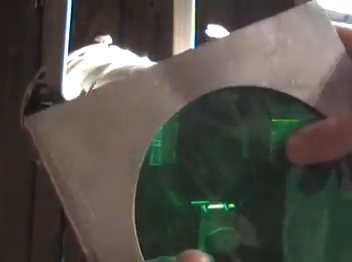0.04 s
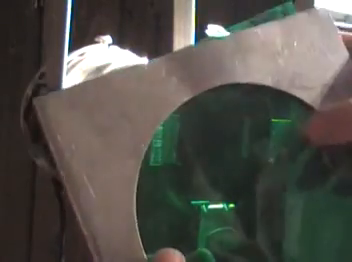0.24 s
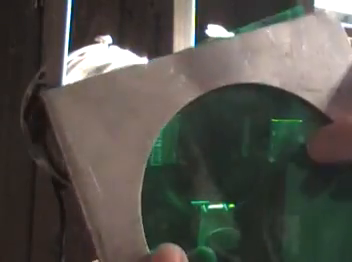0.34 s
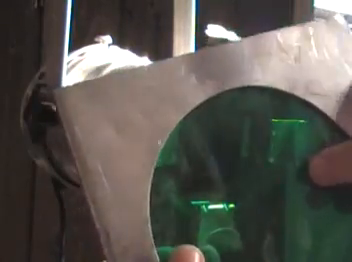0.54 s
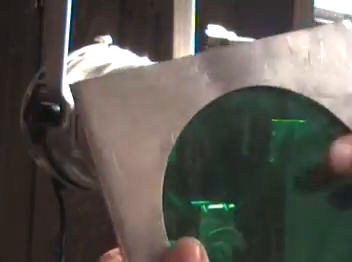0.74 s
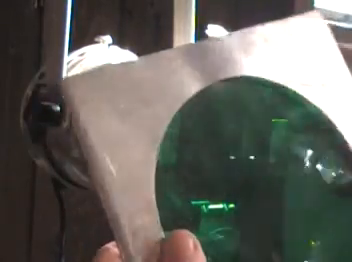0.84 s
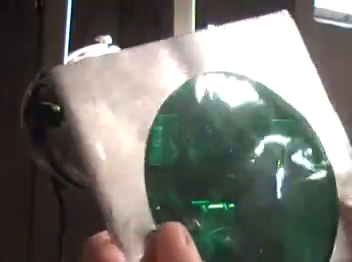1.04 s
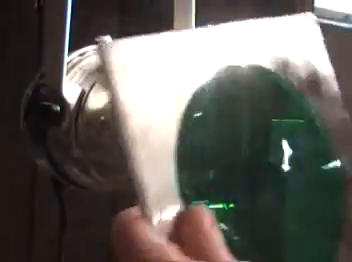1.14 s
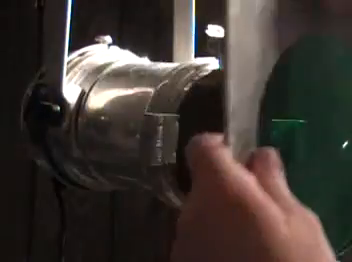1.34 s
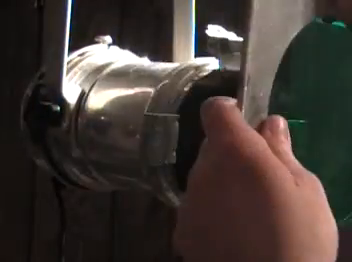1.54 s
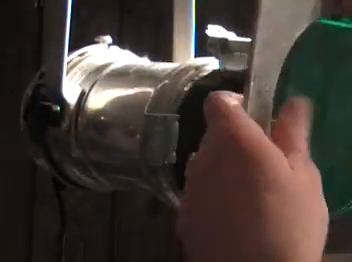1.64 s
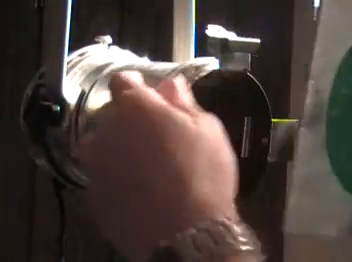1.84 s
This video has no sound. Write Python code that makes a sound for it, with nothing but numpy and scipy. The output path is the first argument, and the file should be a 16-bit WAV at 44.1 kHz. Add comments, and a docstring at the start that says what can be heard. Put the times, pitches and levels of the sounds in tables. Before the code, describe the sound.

A thin plastic sheet slides into a metal frame, close by, with a soft hiss and irregular papery pops for the first 0.8 seconds. It snaps home sharply around 0.8 to 0.9 seconds. After a short lull with tiny faint squeaks, fingers rub the frame and it clicks lightly from about 1.4 to 1.6 seconds, with one sharper click. A faint room rumble and electrical hum lie underneath.

```python
"""In a quiet room, close by, a thin plastic gel sheet is pushed into a sheet-metal frame.
The sheet hisses as it slides, in thousands of tiny slips. It buckles in short papery pops and snaps
home; each pop is a sharp crack and a flutter of waves bending the sheet. Sharp snaps, clicks, rubs and
faint squeaks follow as the frame is handled. Under it all lie a low room rumble and a mains hum."""
import sys
import numpy as np
from scipy import signal
from scipy.fft import rfft, irfft, next_fast_len
from scipy.io import wavfile
from scipy.ndimage import uniform_filter1d

SR = 44100
rng = np.random.default_rng(int(sys.argv[2]) if len(sys.argv) > 2 else 0)


def wav_out(sig):
    """Save sig, one row per channel (or a flat mono array), as 16-bit PCM at SR to the path in sys.argv[1]."""
    wavfile.write(sys.argv[1], SR, np.round(np.clip(np.atleast_2d(sig).T, -1, 1) * 32767).astype(np.int16))


N = 83790
TIME = np.arange(N) / SR
SNAP_TIME = TIME[:SR // 6]


def from_db(db):
    """Turn decibels into a number to multiply by."""
    return 10 ** (np.asarray(db) / 20)


def unit(x):
    """Scale a sound so that its energy is 1."""
    return x / np.sqrt(np.sum(x ** 2) + 1e-20)


def stereo(mid, side, pan_db=0):
    """Make left and right from what they share (mid) and how they differ (side)."""
    return np.array([(mid + side) * from_db(pan_db), (mid - side) * from_db(-pan_db)])


def tinted(x, colour, bass_db=0, treble_db=0, keep_power=True, bass_hz=630, treble_hz=3560):
    """Make each pitch louder or softer along a colour curve, with bass and treble controls."""
    size = next_fast_len(len(x) + 2048)
    hz = np.maximum(np.arange(size // 2 + 1) * SR / size, 1)
    colour_hz, colour_db = np.transpose(colour)
    bass = bass_db / (1 + (hz / bass_hz) ** 4)
    treble = treble_db / (1 + (treble_hz / hz) ** 4)
    gain = from_db(np.interp(np.log(hz), np.log(colour_hz), colour_db) + bass + treble)
    if keep_power:
        gain = gain / np.sqrt(np.mean(gain ** 2))
    # Fold the filter so that it rings only after a sound, never before it.
    cepstrum = irfft(np.log(gain), size)
    cepstrum[1:size // 2] *= 2
    cepstrum[size // 2 + 1:] = 0
    return irfft(rfft(x, size) * np.exp(rfft(cepstrum)), size)[:len(x)]


# The colour of the room's rumble. Each row: pitch in Hz, boost or cut in dB.
RUMBLE_COLOUR = [(25, -17), (60, -2.5), (125, 5.5), (200, -2.5), (700, -10.5), (1300, -20), (2500, -29),
                 (7600, -35.5), (11500, -43), (13500, -69)]
# How wide the rumble sounds. Each row: pitch in Hz, side compared with mid in dB.
RUMBLE_WIDTH = [(100, -3.5), (300, -2), (1300, 1)]
# The tones of the mains hum. Each row: pitch in Hz, level in dB.
HUM_TONES = [(119.7, -59.5), (241, -63.5)]


def background(rumble_db=-51):
    """The room rumbles and the mains hum; the faint hiss sounds wider than the lows."""
    mid, side = [from_db(rumble_db) * tinted(x, RUMBLE_COLOUR) for x in rng.standard_normal((2, N))]
    hum = sum(from_db(db) * np.sqrt(2) * np.sin(2 * np.pi * (hz * TIME + rng.random()))
              for hz, db in HUM_TONES)
    return stereo(mid + hum, tinted(side, RUMBLE_WIDTH, keep_power=False))


# The colour of rubbing. Each row: pitch in Hz, boost or cut in dB.
RUB_COLOUR = [(50, -33), (170, -16), (350, -6.5), (900, 4.5), (1600, 1), (2600, 0), (4200, -3.5), (6000, 1),
              (7800, 3), (9500, -3.5), (12500, -17.5), (14000, -40)]


def friction(slips_per_s=3600, spread_db=3.5, hiss_gain=0.65):
    """Surfaces catch and let go in tiny slips, over a smooth hiss."""
    slips = (rng.random(N) < slips_per_s / SR) * rng.choice([-1, 1], N)
    strength = from_db(spread_db * np.minimum(rng.exponential(1, N), 5))
    hiss = hiss_gain * unit(rng.standard_normal(N))
    return np.sqrt(N) * unit(tinted(unit(slips * strength) + hiss, RUB_COLOUR))


# The sheet sliding in. Each row: time in seconds, level in dB.
SLIDE_LEVELS = [(0, -47), (.045, -50), (.07, -47), (.115, -52), (.15, -39.5), (.205, -44.5), (.245, -48.5),
                (.28, -61), (.305, -50.5), (.335, -45), (.36, -52.5), (.395, -43.5), (.425, -61),
                (.44, -55), (.46, -39), (.485, -48), (.525, -47), (.56, -57), (.59, -38.5), (.625, -55),
                (.66, -50.5), (.682, -42.5), (.712, -49.5), (.728, -43), (.762, -62), (.85, -53),
                (.89, -79), (.933, -59), (.97, -78)]
# Fingers shifting on the frame. Each row: time in seconds, level in dB.
FINGER_LEVELS = [(1.18, -75.5), (1.235, -60.5), (1.32, -71.5), (1.37, -72), (1.405, -58), (1.45, -54),
                 (1.47, -68), (1.495, -57.5), (1.535, -50), (1.61, -49), (1.65, -63), (1.70, -80)]
# How wide rubs and snaps sound. Each row: pitch in Hz, side compared with mid in dB.
CLOSE_WIDTH = [(150, 0.5), (500, -12.5), (1200, -30), (4000, -14.5), (6500, -17.5), (8500, -4.5),
               (12000, -10)]


def rubbing(flicker_db=2.28):
    """The sheet slides between the metal leaves; later the fingers shift their grip."""
    flicker = np.sqrt(N) * unit(uniform_filter1d(rng.standard_normal(N), size=260))
    level = sum(from_db(np.interp(TIME, *np.transpose(rows))) for rows in (SLIDE_LEVELS, FINGER_LEVELS))
    mid = friction()
    side = tinted(friction(), CLOSE_WIDTH, keep_power=False)
    return level * from_db(flicker_db * flicker) * stereo(mid, side, pan_db=-0.55)


def crack(lag_s):
    """High bending waves run faster, so a click becomes a falling chirp; 1 kHz takes lag_s to arrive."""
    size = len(SNAP_TIME)
    khz = np.arange(size // 2 + 1) * SR / size / 1000
    chirp = irfft(np.exp(-4j * np.pi * 1000 * lag_s * np.sqrt(khz)), size)
    return chirp * (np.arange(size) < size // 2)


def flutter(fade_s, split_hz=2210, lows_linger=1.7):
    """Bending waves cross a thin plate in a dense burst; the slow, low ones die last."""
    lowpass = signal.butter(2, split_hz, fs=SR, output="sos")
    highpass = signal.butter(2, split_hz, "high", fs=SR, output="sos")
    low_noise, high_noise = rng.choice([-1., 1.], (2, len(SNAP_TIME)))
    lows = signal.sosfilt(lowpass, low_noise * np.exp(-SNAP_TIME / (fade_s * lows_linger)))
    highs = signal.sosfilt(highpass, high_noise * np.exp(-SNAP_TIME / fade_s))
    return unit(lows + highs)


def ringing(hz, ring_s):
    """One struck tone, which fades by 60 dB in its ring time, ring_s."""
    return unit(np.sin(2 * np.pi * hz * SNAP_TIME) * from_db(-60 * SNAP_TIME / ring_s))


def snaps(rows, colour, tones, lag_s, spot_db=5, spot_octaves=0.4):
    """A spot gives way with a crack, a flutter and a faint ring, all favouring the spot's own pitch."""
    mid, side = np.zeros((2, N + SR))
    pitches = np.geomspace(50, 20000, 200)
    colour_hz, colour_db = np.transpose(colour)
    body_db = np.interp(np.log(pitches), np.log(colour_hz), colour_db)
    for start_s, db, bass_db, treble_db, crack_db, fade_s, spot_hz in rows:
        peak_db = spot_db * np.exp(-(np.log2(pitches / spot_hz) / spot_octaves) ** 2)
        spot_colour = np.column_stack([pitches, body_db + peak_db])
        burst = flutter(fade_s) + from_db(crack_db) * crack(lag_s)
        burst = tinted(burst, spot_colour, bass_db, treble_db)
        ring = sum(from_db(tone_db + rng.normal(0, 4.3)) * ringing(hz, ring_s)
                   for hz, tone_db, ring_s in tones)
        ring = tinted(ring, np.column_stack([pitches, peak_db]), bass_db, treble_db, keep_power=False)
        ring *= from_db(-max(treble_db, 0))  # a brighter snap does not ring louder
        side_burst = tinted(flutter(fade_s), spot_colour, bass_db, treble_db)
        start = int(start_s * SR)
        mid[start:start + len(burst)] += from_db(db) * (unit(burst) + ring)
        side[start:start + len(burst)] += from_db(db) * unit(side_burst)
    return stereo(mid[:N], tinted(side[:N], CLOSE_WIDTH, keep_power=False), pan_db=-0.3)


# The sheet's pops. Each row: start in seconds, level in dB, bass in dB, treble in dB,
# crack compared with flutter in dB, flutter fade time in seconds, pitch of the spot in Hz.
SHEET_POPS = [(.0197, -13, -7, 23, -19, 0.0014, 6700), (.0882, -9, -10.5, -2.5, -18, 0.006, 820),
              (.0985, -7, -0.5, -0.5, -4, 0.014, 1570), (.166, -13, 0, -21, -18, 0.0019, 1500),
              (.237, -16.5, -11, -3.5, -29, 0.0056, 1590), (.2968, -16.5, 10, 1.5, -2, 0.0041, 900),
              (.310, -10.5, -10, -7, 0, 0.0053, 2130), (.3232, -2.5, 3.5, -1.5, -15, .015, 1440),
              (.3995, -12, -1, 0, -23, 0.009, 890), (.4320, -18, 13.5, 4.5, -2, 0.0032, 880),
              (.486, -14.5, 8, -15, -10, 0.0096, 900), (.502, -14.5, 5.5, 1, -13, 0.0044, 6250),
              (.517, -11, 4, -13, -19, 0.012, 1510), (.530, -14, 14, -26, -18, 0.0039, 845),
              (.543, -14.5, 7, -28, -20, 0.0078, 1400), (.5775, -7.5, 1.5, -18, -16, 0.016, 342),
              (.588, -14.5, -1, -2, 9, 0.0046, 1580), (.680, -12, 5, -1, -10, 0.013, 734),
              (.727, -19, 15, 15, -5, .004, 8000), (.7752, -1.3, 1, 3, -2.5, 0.0063, 670)]
# The colour of the plastic. Each row: pitch in Hz, boost or cut in dB.
SHEET_COLOUR = [(50, -67), (120, -20), (220, -5.5), (340, 0), (600, -0.5), (850, 2), (1600, -0.5),
                (2400, -3), (4000, -4.5), (7500, -6.5), (10000, -19), (13000, -40), (15000, -60)]
# The sheet's own tones. Each row: pitch in Hz, typical level within a pop in dB, ring time in seconds.
SHEET_TONES = [(343.7, -17.5, 0.15), (856, -15, 0.033), (1130, -25, 0.18), (1545, -26, 0.15)]


def sheet_pops():
    """The pushed plastic buckles again and again, then snaps home."""
    return snaps(SHEET_POPS, SHEET_COLOUR, SHEET_TONES, lag_s=0.000779)


# Knocks and pings. Each row: start in seconds, pitch in Hz, level in dB, ring time in seconds.
PATCH_KNOCKS = [(.0882, 844, -9, 0.049), (.3995, 12400, -24, 0.0032), (.9066, 3900, -11, 0.01),
                (1.563, 1110, -16.5, 0.03), (1.633, 840, -11.5, 0.042)]


def knocks():
    """Some contacts make one patch of sheet or frame ring, as a hollow knock or a bright ping."""
    mid = np.zeros(N + SR)
    for start_s, hz, db, ring_s in PATCH_KNOCKS:
        start = int(start_s * SR)
        mid[start:start + len(SNAP_TIME)] += from_db(db) * ringing(hz, ring_s)
    return stereo(mid[:N], 0, pan_db=-0.3)


# Sharp snaps and clicks. Each row: start in seconds, level in dB, bass in dB, treble in dB,
# crack compared with flutter in dB, flutter fade time in seconds, pitch of the spot in Hz.
SHARP_CLICKS = [(.8207, 6, -5.5, 2, 1, 0.0037, 2100), (.9066, -2, 9, 11.5, -3, 0.0044, 7800),
                (1.378, -28.5, 5, 10, -9, 0.0091, 2700), (1.399, -23, 1, 6.5, 1, 0.0052, 2700),
                (1.429, -20.5, 8.5, -6, -1, 0.019, 1290), (1.5135, -15, 3, 5.5, -4, 0.0023, 1700),
                (1.563, -7, -2, -12, -11, 0.013, 2000), (1.5755, 1.5, 0.5, 3, -39, 0.0064, 4360),
                (1.619, -16.5, 19, -8, -6, 0.0076, 1860), (1.633, -7.5, -4, 0, -2, 0.0086, 1140),
                (1.8365, -36, -1, 8, 7, 0.0026, 6400)]
# Their colour. Each row: pitch in Hz, boost or cut in dB.
CLICK_COLOUR = [(100, -39), (300, -3), (650, -5), (1050, 3), (1500, -1.5), (2200, 0), (3300, -3),
                (4050, -5), (5200, -5.5), (6500, 0), (8200, -7), (10000, -14), (13500, -35)]
# Their ringing tones. Each row: pitch in Hz, typical level within a click in dB, ring time in seconds.
CLICK_TONES = [(1009, -18, 0.098), (1110, -23.5, 0.088), (1525, -17, 0.052), (1950, -31, 0.034),
               (2663, -14, 0.085), (4100, -20, 0.054), (6410, -23, 0.038)]


def sharp_clicks():
    """Sharp snaps and clicks that ring briefly."""
    return snaps(SHARP_CLICKS, CLICK_COLOUR, CLICK_TONES, lag_s=0.00008)


# Faint squeaks. Each row: loudest moment in seconds, pitch in Hz, level in dB.
FAINT_SQUEAKS = [(1.021, 1924, -58.5), (1.322, 1894, -58), (1.784, 2910, -61.5)]


def squeaks(swell_s=0.0052):
    """As the frame is handled, tiny tones swell and fade in a few hundredths of a second."""
    return sum(from_db(db) * np.sin(2 * np.pi * hz * TIME) * np.exp(-((TIME - peak_s) / swell_s) ** 2)
               for peak_s, hz, db in FAINT_SQUEAKS)


def room_echo(sound, ring_s=0.18, delay_s=0.0066, dull_hz=4600, level_db=-13.5, side_db=-11):
    """Sound bounces around the room and leaves a short, dull tail."""
    t = TIME[:SR // 2]
    tails = rng.standard_normal((2, len(t))) * from_db(-60 * t / ring_s) * (t > delay_s)
    lowpass = signal.butter(1, dull_hz, fs=SR, output="sos")
    dull_tails = [signal.sosfilt(lowpass, unit(tail)) for tail in tails]
    mid, side = [signal.fftconvolve(sound.mean(axis=0), tail)[:N] for tail in dull_tails]
    return from_db(level_db) * stereo(mid, from_db(side_db) * side)


def scene():
    """Add up the sheet, the frame, their echo and the room's own noise."""
    close = sheet_pops() + sharp_clicks() + knocks() + rubbing() + squeaks()
    return close + room_echo(close) + background()


def record(dry, left_bass_hz=122, top_hz=14900):
    """The left microphone loses some bass; the highest treble is cut steeply on both sides."""
    bass_cut = signal.butter(1, left_bass_hz, "high", fs=SR, output="sos")
    top_cut = signal.cheby2(14, 50, top_hz, fs=SR, output="sos")
    left = signal.sosfilt(bass_cut, dry[0])
    return signal.sosfilt(top_cut, np.array([left, dry[1]]))


dry = scene()
out = record(dry)
wav_out(out)
```